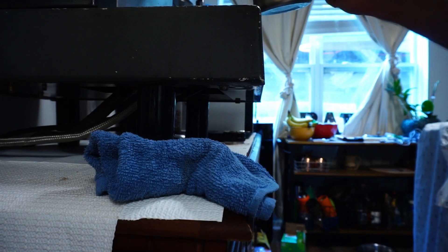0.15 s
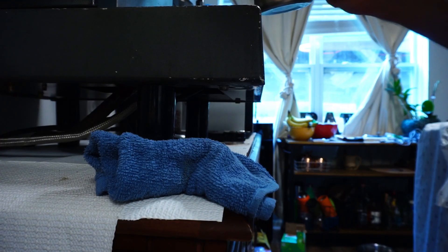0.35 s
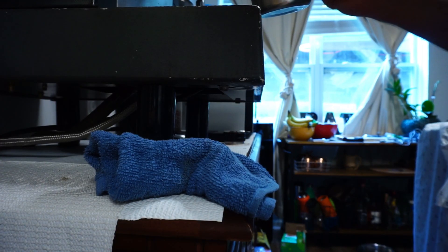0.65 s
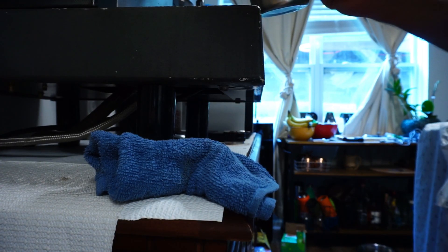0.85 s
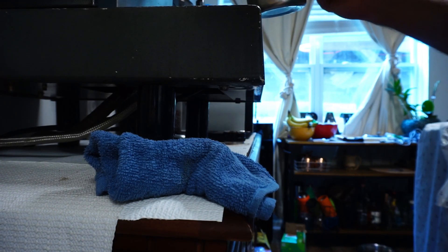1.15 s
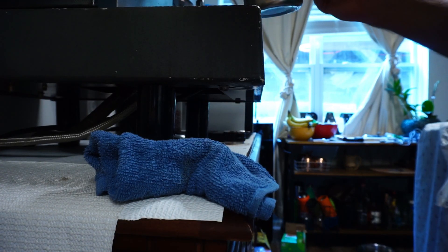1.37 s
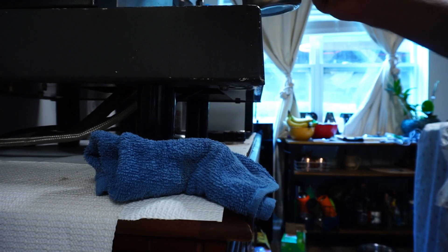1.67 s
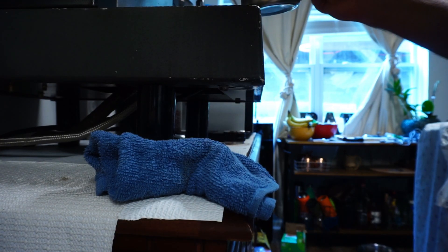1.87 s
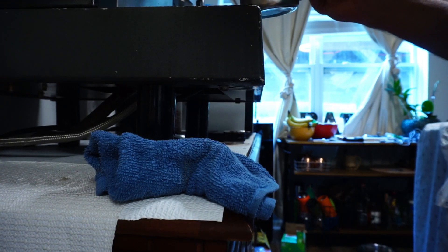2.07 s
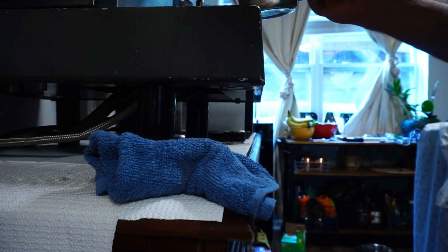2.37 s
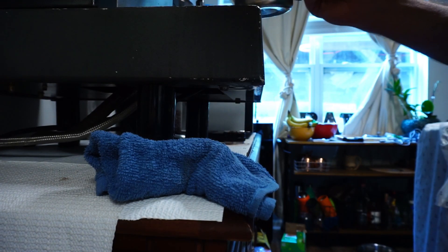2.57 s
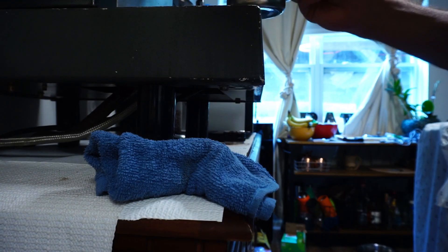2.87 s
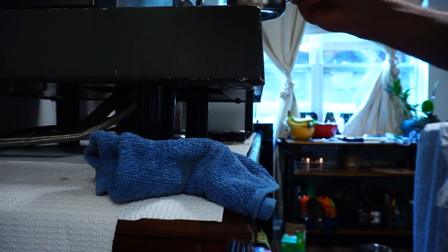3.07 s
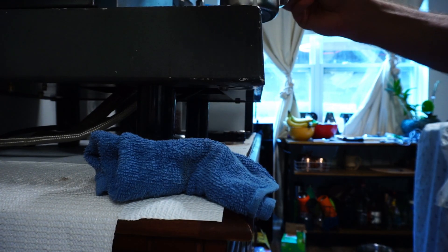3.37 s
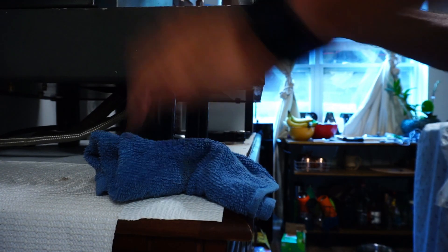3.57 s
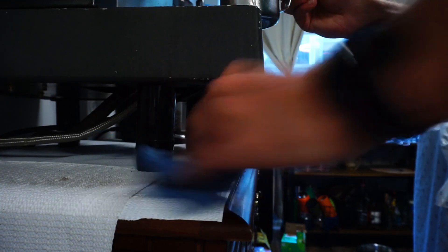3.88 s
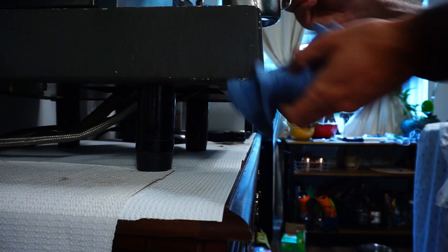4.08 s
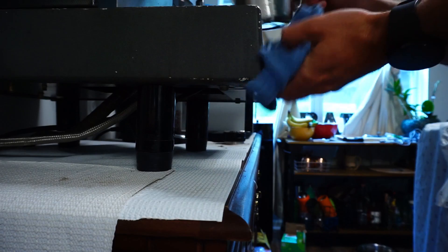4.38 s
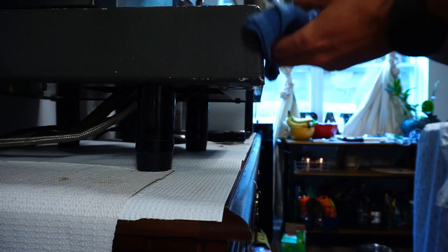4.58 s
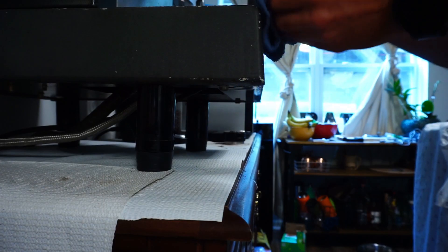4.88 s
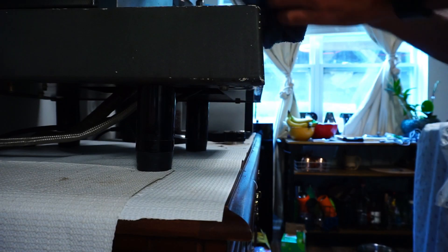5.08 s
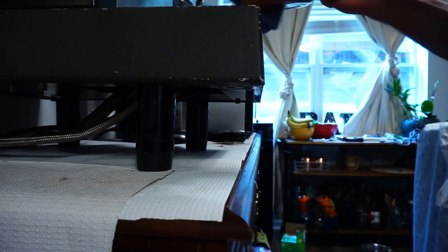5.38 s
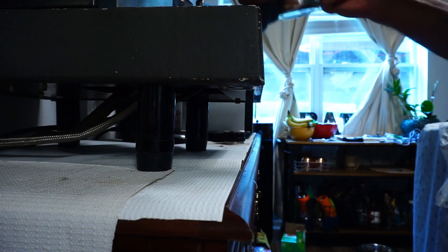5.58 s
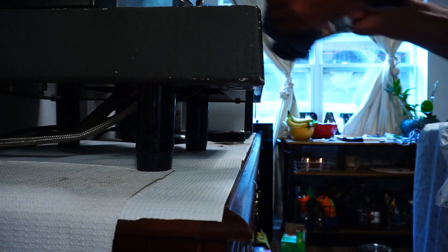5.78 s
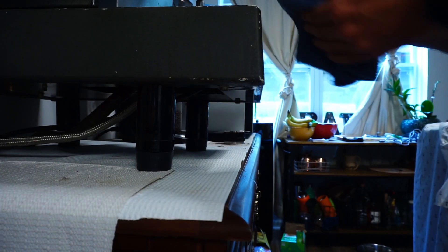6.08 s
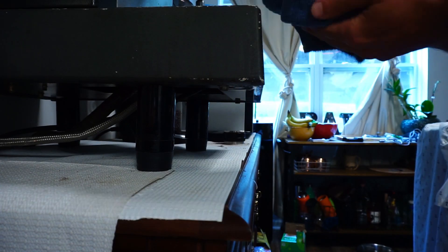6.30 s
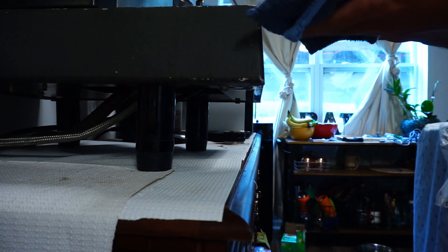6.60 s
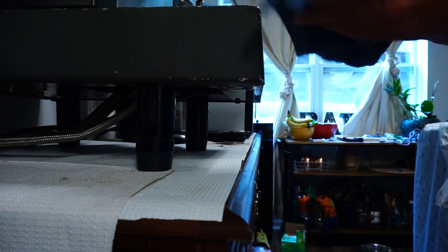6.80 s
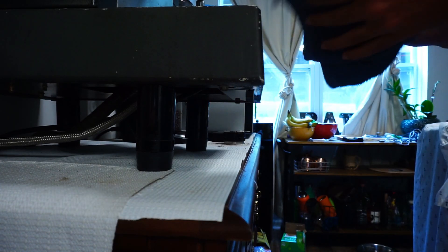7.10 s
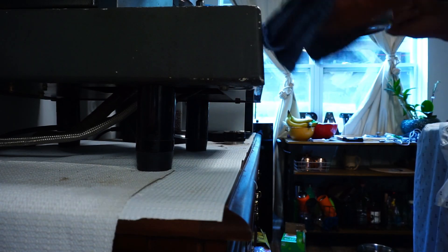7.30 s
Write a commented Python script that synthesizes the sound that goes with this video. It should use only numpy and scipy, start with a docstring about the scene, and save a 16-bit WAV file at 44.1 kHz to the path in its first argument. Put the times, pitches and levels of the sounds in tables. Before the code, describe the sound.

A steam wand hisses loudly in a steel pitcher of milk from the start, spitting in sharp, tearing bursts over crackling, churning bubbles. At about 1.4 seconds the spitting stops and the jet becomes quieter and steadier. A few softer spits return after 2.2 seconds, and a high, breathy whistle joins at around 2.5. Just after 3.1 seconds the valve shuts with a short squeal, and the milk gurgles low until about 3.7. Light, ringing metal knocks follow as the wand is moved, near 4 seconds, loudest at 4.4, and again at 4.8. A cloth rubs faintly along the wand, with small squeaks and another knock between 5.5 and 5.8 seconds. The rubbing fades, and faint taps come near 6.8 and 7.2. Everything is close, with the short echo of a small kitchen over soft, steady air noise and a faint appliance hum.

```python
"""Torn, spitting hiss comes first: a steam wand's tip gulps air at the surface of milk in a steel pitcher.
Below it the jet is noise through nozzle resonances, and collapsing bubbles are a crackle that rings the
pitcher. The valve shuts with short whistles, and gliding low tones gurgle as the milk settles.
Then the wand is swung and wiped: ringing knocks, rubbed-cloth noise and unsteady squeaks.
Echoes of a small kitchen surround it all, over steady air noise and a faint hum."""
import sys
import numpy as np
from scipy import signal
from scipy.fft import rfft, irfft
from scipy.io import wavfile
from scipy.ndimage import uniform_filter1d

SR = 44100
rng = np.random.default_rng(int(sys.argv[2]) if len(sys.argv) > 2 else 0)


def dump_mix(stems):
    """Bounce the given channels to the path in sys.argv[1] as a 16-bit WAV at rate SR."""
    frames = np.atleast_2d(stems).T  # one column per channel
    limited = np.clip(frames, -1, 1)  # hard clip at full scale
    pcm = np.round(limited * 32767).astype(np.int16)
    wavfile.write(sys.argv[1], SR, pcm)


N = 328545
TIME, HZ = np.arange(N) / SR, np.fft.rfftfreq(N, 1 / SR)

# Levels of sources are before the kitchen's echoes.
# The tip breaks the surface and sucks air:
# t/s, length/s, level/dB before the opening burst, brightness/(dB per octave), pitch of the air cavity f/Hz
GULPS = [(0, 0.017, -5, 4.5, 12600), (0.022, 0.12, -15, -3.5, 10700), (.135, 0.041, -12, -4, 13300),
         (0.255, .007, -18, 5, 14000), (0.334, 0.0087, -29, -11, 12370), (0.409, 0.012, -16.5, -6, 10000),
         (0.446, 0.0099, -15.5, -7, 10900), (0.474, 0.0086, -13, 3, 13400), (0.554, 0.025, -7, -2.5, 13200),
         (0.58, 0.097, -9.5, -1.5, 12400), (0.756, 0.012, -18, -3, 9400), (0.779, 0.017, -9, 1.5, 12700),
         (0.81, .008, -14, -13, 9300), (0.822, .01, -11, -2, 14300), (0.845, .016, -7.5, -2.5, 9250),
         (0.887, .018, -15, -5, 9400), (0.915, .075, -6.5, -1.5, 9400), (1.084, 0.017, -6.5, 0.5, 9400),
         (1.107, 0.019, -5, 2, 12300), (1.192, 0.04, -17.5, -9, 12500), (1.291, .010, -12.5, -6, 15000),
         (1.316, 0.03, -12.5, -8.5, 13000), (2.226, 0.018, -22, -16, 4700),
         (2.259, 0.0069, -23.5, -15, 9000), (2.282, .0055, -24, -13, 10500),
         (2.293, 0.0039, -13.5, -4, 14000), (2.392, .0089, -26.5, -6, 5000),
         (2.938, 0.036, -24.5, -17, 6300), (2.983, .008, -30, -21, 6200), (3.107, 0.04, -28, -17.5, 9800)]
# Spectrum of torn air: f/Hz, level/dB
TEARING_COLOUR = [(30, -94), (150, -63.5), (400, -60.5), (1400, -30), (2600, -22.5), (3500, -23.5),
                  (4500, -15), (5600, -12), (7000, -6.5), (9500, -1.5), (12500, 0), (16000, 0)]
SPRAY_SHARE, SPRAY_S = 0.12, 0.033  # share of each gulp that trails on as spray, and its fading time
CAVITY_WIDTH_HZ, CAVITY_DB = 1900, 5

# Steam through the nozzle: t/s, level/dB
JET_LEVEL = [(0, -14), (.3, -35), (.55, -19), (1.27, -27), (1.37, -24), (1.48, -41.5), (2.3, -36.5),
             (3.14, -34)]
# Spectrum of the jet: f/Hz, level/dB
JET_COLOUR = [(40, -60), (200, -36), (500, -9), (2000, -42.5), (4500, -1.5), (6000, -3.5), (8000, -4.5),
              (12000, -0.5), (14000, -1), (16000, 0)]
# Resonances (or dips) of the nozzle: f/Hz, width/Hz, level/dB
NOZZLE = [(6630, 300, 3.5), (7700, 340, 8.5), (7900, 350, -4.5), (8520, 240, 12), (9390, 200, 4),
          (9970, 260, 3), (11280, 190, 8), (11900, 299, 4.5), (13070, 250, 6.5), (14100, 600, -3),
          (15000, 360, 7.5), (15700, 300, 4)]
# A breathy whistle at the tip as the valve narrows: t/s, f/Hz, level/dB
SINGING = [(2.45, 4900, -62), (2.58, 4880, -45), (2.7, 4860, -39.5), (2.78, 4840, -40), (2.92, 4820, -36.5),
           (2.99, 4790, -36), (3.06, 4780, -56)]
SINGING_WIDTH_HZ = 260  # width of its breathy part
SINGING_CLEAN, SINGING_WAVER = .35, .012  # share of pure tone, and rms wobble of its pitch as a share
SHUT_S, JET_DIES_S = 3.145, 0.012  # the valve closes, and how fast the jet fades
AFTER_DB, AFTER_S = -15.5, 0.14  # steam left in the wand leaks away: level and fading time

# Collapsing bubbles, before the small lifts in boil():
# t/s, churn of the milk level/dB, sizzle of the finest bubbles level/dB
BOIL_LEVEL = [(0.0, -31, -28), (0.12, -28, -26), (.545, -33.5, -26.5), (.585, -38.5, -31),
              (.62, -34, -31.5), (.69, -31, -24), (0.98, -30.5, -26), (1.01, -33.5, -31.5),
              (1.18, -24.5, -24.5), (1.42, -33, -26), (1.46, -35, -36), (1.578, -32, -35),
              (1.832, -45.5, -48), (2.13, -45, -46), (2.25, -40, -35), (2.45, -40, -41.5),
              (2.76, -40.5, -46.5), (2.785, -37.5, -38), (2.93, -36, -40), (2.96, -31.5, -36),
              (3.1, -32.5, -36.5), (3.16, -32.5, -36.5), (3.21, -32.5, -51), (3.3, -54, -39)]
# Spectrum of the churn: f/Hz, level/dB
CHURN_COLOUR = [(25, -55), (70, -31.5), (140, -6.5), (300, -3.5), (600, -1.5), (900, 0.5), (1350, 4.5),
                (2200, -2), (3000, -2.5), (5000, -27), (10000, -51.5)]
# Spectrum of the sizzle: f/Hz, level/dB
SIZZLE_COLOUR = [(1000, -38), (2500, -19), (3300, 4), (4100, 4.5), (5000, 0.5), (6000, -5), (9000, -8),
                 (16000, -38)]
# Resonances (or dips) of the steel pitcher: f/Hz, width/Hz, level/dB
PITCHER = [(455, 17, 9), (594, 45, 7.5), (868, 78, 5), (1235, 78, 5), (1398, 57, 8), (1568, 50, 9),
           (1700, 83, 5), (1985, 39, 10.5), (2137, 54, 13), (2666, 440, 6.5), (3040, 130, -4),
           (3214, 150, 3.5), (4200, 170, 0.5)]
# Surges as larger pockets of steam cave in, and brief dips: t/s, length/s, change of the sizzle level/dB
SURGES = [(0.729, 0.018, 3), (1.171, 0.011, 3.5), (1.2, 0.026, 5.5), (1.252, 0.0048, -1), (1.507, 0.011, 4),
          (1.543, 0.0076, -9), (2.389, 0.013, 7.5), (2.429, 0.0058, 6.5), (2.48, .006, 7),
          (2.496, 0.012, 11), (3.042, .006, 3)]
SURGE_CHURN, SURGE_DIES_S = 0.41, 0.0016  # share of a surge that the churn follows, and its fall
# The cloud of fine bubbles rings lower overall as the foam grows: t/s, f/Hz
CLOUD_PITCH = [(.3, 4270), (1.2, 4100), (1.6, 3860), (2.25, 4100), (2.6, 3440), (2.95, 3280), (3.2, 2980)]
CLOUD_WIDTH_HZ, CLOUD_DB = 660, -8  # its level is relative to the fine crackle
BOIL_LINGERS_S, BOIL_DIES_S = 0.078, 0.013  # the last steam still collapses in the milk

# The plainest gurgles and puffs in the milk: t/s, starting pitch f/Hz, level/dB, time to fall 60 dB t60/s
GURGLES = [(0.026, 253, -29, 0.4), (0.069, 299.4, -29, 0.22), (0.132, 262.5, -30.5, 0.3),
           (0.171, 315, -31, 0.23), (1.278, 147.4, -34.5, 0.32), (1.5, 148, -36, 0.31),
           (2.089, 334, -33.5, 0.12), (2.1, 422, -30.5, .08), (2.494, 150, -32, 0.19),
           (2.959, 146, -33, 0.17), (3.065, 601, -25, 0.087), (3.074, 145, -31, 0.19),
           (3.2, 407, -26, 0.11), (3.203, 638, -21, 0.081), (3.219, 279, -28, 0.075),
           (3.26, 239, -37, 0.29), (3.305, 154, -31, 0.23), (3.362, 138, -24.5, 0.14),
           (3.48, 227, -34, 0.12), (3.49, 153, -35, 0.16), (3.569, 140, -41, .25)]
# Lesser bubbles: middle pitch, spread up and down, level relative to the churn table, t60 in s
BUBBLE_HZ, BUBBLE_OCTAVES, BUBBLE_DB, BUBBLE_T60 = 259, 0.7, -5.5, 0.1

# Whistles and rough hoots of the closing valve:
# t/s, length/s, f/Hz, level/dB, fall per overtone/dB, rms wobble of pitch as a share
WHISTLES = [(3.143, 0.0085, 3270, -22.5, -9, 0.024), (3.149, 0.0081, 2590, -24.5, -12, 0.16),
            (3.16, 0.041, 1645, -33.5, -30, 0.097)]

# Knocks and the swells of their lingering ring:
# t/s, level/dB, centre of what it excites f/Hz, spread/octaves, metal tick level/dB
KNOCKS = [(3.924, -32, 516, 1.8, -52), (3.946, -36, 330, 1.2, -61), (4.0374, -37, 600, 3.2, -31),
          (4.052, -38.5, 330, 1.4, -35), (4.4137, -21.5, 676, 0.68, -35), (4.418, -37.5, 145, 0.48, -60),
          (4.421, -35.5, 1570, 0.67, -40), (4.425, -27, 396, 0.47, -44), (4.443, -35, 474, 1.1, -53),
          (4.465, -37, 700, 0.88, -56), (4.495, -39.5, 2800, 0.35, -37.5), (4.7642, -38, 1500, 2.5, -31),
          (4.767, -39, 710, 0.28, -46), (4.778, -40.5, 226, 0.23, -50), (4.828, -43, 248, 0.18, -69),
          (5.26, -47.5, 984, 1.06, -49.5), (5.533, -43.5, 940, 0.7, -66), (5.705, -39, 265, 0.41, -53),
          (5.7716, -29, 680, 0.21, -28.5), (5.775, -35.5, 290, 0.34, -60), (5.785, -44, 690, 0.29, -46),
          (5.83, -40, 263, 0.48, -70), (6.813, -48, 3700, 0.6, -58), (7.2, -41.5, 424, 1, -74),
          (7.226, -49, 400, 1.1, -72)]
# What the machine rings with, before the grip's detuning: f/Hz, level/dB, t60/s
MACHINE_MODES = [(145.4, 1, 0.18), (216, -3, 0.5), (241.1, -0.5, 0.66), (286, 6.5, 0.19), (343, -1.5, 0.12),
                 (386, 0.5, .1), (412.6, 5.5, 0.18), (467, -3.5, 0.076), (535, 1.5, 0.11), (650, 3, 0.064),
                 (719, 5.5, 0.075), (1144, 2, 0.086), (1400, -0.5, 0.08), (1497, -8, 0.2),
                 (1949, -2, 0.083), (2130, -3, 0.1), (2410, -5, 0.07), (3350, 9, 0.022), (3770, -2, .08),
                 (4270, -1, 0.16)]
# Spectrum of the metal tick: f/Hz, level/dB
TICK_COLOUR = [(500, 0), (2000, -1), (3500, -3), (6000, 0), (12000, -1.5), (16000, -6.5)]
GRIP_DETUNE = .011  # the hand's grip shifts each mode from row to row: rms, as a share
RING_UP_CYCLES = 0.2  # swelling time in cycles, so low modes take longer

# Strokes of the cloth on steel: t/s, swell/s, fade/s, level/dB
STROKES = [(3.77, 0.16, 0.1, -51.5), (4.41, 0.024, 0.52, -51.5), (4.62, 0.22, 0.13, -65.5),
           (5.23, 0.085, .08, -58.5), (5.5, 0.068, 0.77, -58.5), (5.689, 0.01, 0.077, -40)]
# Spectrum of the rubbed cloth: f/Hz, level/dB
WEAVE_COLOUR = [(150, -8), (700, 9.5), (1600, 5), (3000, -0.5), (4500, 2), (7000, -1.5), (10000, 4.5),
                (16000, -3)]
# The wand scrapes and squeaks as it turns:
# t/s, length/s, f/Hz, level/dB, fall per overtone/dB, rms wobble of pitch as a share
SQUEAKS = [(5.55, 0.062, 1447, -54, -15, 0.41), (5.692, 0.0043, 1560, -31, -29, 0.034),
           (5.703, 0.013, 1538, -32.5, -30, 0.046), (5.692, 0.033, 2250, -45, -25, 0.048),
           (5.722, 0.057, 1384, -46, -27, 0.116), (5.724, 0.034, 743, -43, -17, 0.095)]

# Spectrum of the steady air noise: f/Hz, level/dB
AIR_COLOUR = [(15, -38.5), (25, -8), (64, -4), (160, -3), (188, -6.5), (227, -6), (378, -7.5), (469, -13),
              (582, -15), (741, -13), (871, -15.5), (1110, -17), (1200, -18), (3630, -24.5), (15500, -24)]
AIR_DB = -54
# Width of the steady noise, narrow in bass and top treble, wide between: f/Hz, side over mid as a ratio
AIR_WIDTH = [(80, 0.18), (220, 0.578), (500, 1.3), (1100, 1.5), (4000, 1.3), (7000, .8), (9500, 0.054)]
# Hum of appliances: f/Hz, rms level/dB
HUM = [(59.5, -66), (221, -71), (474, -68.5)]

# How fast the kitchen's tail dies: f/Hz, t60/s
KITCHEN_T60 = [(150, 1), (500, 0.94), (1500, 0.58), (4000, 0.27), (9000, 0.4), (16000, 0.19)]
# Share of each echo that differs between the microphones, for handling and gurgles: f/Hz, share
APART = [(100, 0.22), (400, 0.5), (1200, 0.65), (4000, 0.8), (6500, 0.9), (10000, 0)]
# The same for the loud gulps: f/Hz, share
GULP_APART = [(400, .35), (4000, .6), (8000, .42), (14000, .36)]
# The same for the steam: f/Hz, share
STEAM_APART = [(100, .3), (400, .3), (1200, .62), (2200, .55), (4000, .8), (6500, .9), (10000, .3)]
# How far sound favours the left microphone: f/Hz, multiple of each source's own lean
LEAN = [(380, 0.052), (700, 2.1), (1300, 0.48), (2400, 0.84), (8000, 2.6), (15000, 1.1)]
# The steam drifts to the left as the pitcher is moved: t/s, left minus right level/dB
SHIFT = [(1.2, 0), (2.0, 2), (2.7, 1.3), (3.15, 1.5)]

# Gain control: threshold, gain cut in dB per dB over it, and how fast the held peak level sinks
LIMIT_DB, SQUEEZE, RECOVER_DB_PER_S = -19, 0.3, 26
EDGE_HZ = 15950  # top of the band


def gulps(patchy_db=3.5, burst_s=0.0066, flutter_db=0.7):
    """Each gulp bursts open and sprays on, coloured by its own air cavity and by quickly shifting patches."""
    _, _, grid = signal.stft(crackle(per_s=550, spread_db=3.3, wash=1), SR, nperseg=512)
    # smooth chance over pitch and time makes the patches
    patches = uniform_filter1d(rng.standard_normal(grid.shape), size=5, axis=0)
    patches = unit(uniform_filter1d(patches, size=4, axis=1))
    patchy = signal.istft(grid * amp(patchy_db * patches), SR, nperseg=512)[1][:N]
    spray = colour(patchy, TEARING_COLOUR) * amp(flutter_db * wander(N, 110))

    out, t = np.zeros(N), np.arange(SR // 4) / SR
    hz = np.fft.rfftfreq(len(t), 1 / SR)
    octaves = np.log2(np.maximum(hz, 3500) / 9000)
    rise, fall, burst = .0005, .0036, .38  # s, s, extra gain at the start
    for s, length, db, tilt, cavity_hz in GULPS:
        cavity = CAVITY_DB / (1 + (2 * (hz - cavity_hz) / CAVITY_WIDTH_HZ) ** 2)
        piece = spray[max(0, round(s * SR)):][:len(t)]
        tear = irfft(rfft(piece) * amp(tilt * octaves + cavity), len(t))
        body = (1 - SPRAY_SHARE) * gate(t, length, rise, fall)
        trail = SPRAY_SHARE * gate(t, length, rise, SPRAY_S)
        opening = 1 + burst * np.exp(-t / burst_s)
        add(out, s, amp(db) * unit(tear) * (body + trail) * opening)
    return out


def jet(flutter_db=0.4):
    """The submerged jet hisses through the resonances of the nozzle, and sings as the valve narrows."""
    hiss = colour(rng.standard_normal(N), JET_COLOUR, NOZZLE)
    when, hz, _ = np.transpose(SINGING)
    pitch = np.interp(TIME, when, hz) * (1 + SINGING_WAVER * wander(N, 250))
    tone = unit(np.sin(2 * np.pi * np.cumsum(pitch) / SR))
    breath = ringing(SINGING, SINGING_WIDTH_HZ)
    song = (breath * (1 - SINGING_CLEAN) + tone * SINGING_CLEAN) * level(SINGING, column=2)
    flutter = amp(flutter_db * wander(N, 50.1))
    return (level(JET_LEVEL) * hiss + song) * flutter * shut(SHUT_S, JET_DIES_S)


def boil(churn_db=1.0, sizzle_db=1.0, throb_db=1.2, clump_db=1.4):
    """Steam bubbles collapse in clumps and surges, and ring the pitcher and the cloud of foam."""
    surge_db = sum(db * (TIME > s) * flow(s + length, SURGE_DIES_S) for s, length, db in SURGES)
    coarse = colour(crackle(per_s=600, spread_db=2.5, wash=1.0), CHURN_COLOUR, PITCHER)
    churn = coarse * level(BOIL_LEVEL) * amp(churn_db + SURGE_CHURN * surge_db)
    fine = colour(crackle(per_s=900, spread_db=2.8, wash=.6), SIZZLE_COLOUR, PITCHER)
    cloud = amp(CLOUD_DB) * ringing(CLOUD_PITCH, CLOUD_WIDTH_HZ)
    clumps = amp(sizzle_db + surge_db + clump_db * wander(N, 70))
    sizzle = (fine + cloud) * level(BOIL_LEVEL, column=2) * clumps
    throb = amp(throb_db * wander(N, 190))
    return (churn + sizzle) * throb * shut(SHUT_S + BOIL_LINGERS_S, BOIL_DIES_S)


def whistles():
    """Steam squeals and hoots through the closing valve, as short unsteady tones."""
    return squeals(WHISTLES, swell=0.029, fall=0.016)


def gurgles(glide=-0.72, waver=0.054, count=10):
    """Gurgles and bubbles swell, wobble and ring, gliding down by a share of their pitch per second."""
    out, t = np.zeros(N), np.arange(SR // 3) / SR
    swell = 1 - np.exp(-t / .014)
    when, churn_db, _ = np.transpose(BOIL_LEVEL)
    # while the valve is open, one lesser bubble falls at random in each of equal slots of time
    late, size = rng.random((count, 2)).T
    starts = SHUT_S * (np.arange(count) + late) / count
    pitches = BUBBLE_HZ * 2 ** (BUBBLE_OCTAVES * (2 * size - 1))
    lesser = [(s, hz, np.interp(s, when, churn_db) + BUBBLE_DB, BUBBLE_T60)
              for s, hz in zip(starts, pitches)]
    for s, hz, db, t60 in GURGLES + lesser:
        turns = np.cumsum(hz * (1 + glide * t + waver * wander(len(t), 39.6))) / SR
        add(out, s, amp(db - 60 * t / t60) * swell * np.sin(2 * np.pi * turns))
    return out


def snap(s=3.573, hz=6400, db=-30.0, fall=0.00068):
    """One tiny dry snap of coloured noise, as of a foam bubble bursting."""
    out, t = np.zeros(N), np.arange(SR // 50) / SR
    spectrum = [(2500, -37), (4500, -6), (8000, 18.0), (16000, -33)]  # f/Hz, level/dB
    fizz = colour(rng.standard_normal(N), spectrum, [(hz, 1800, 8)])
    add(out, s, amp(db) * fizz[:len(t)] * np.exp(-t / fall))
    return out


def knocks(tick_s=0.0029, clatter=0.57, clatter_s=0.0083, rise=0.00063):
    """Each knock or swell rings the machine's modes near its centre, with a short clatter and a metal tick."""
    out, ticks, t = np.zeros(N), np.zeros(N), np.arange(SR) / SR
    mode_hz, mode_db, t60 = np.transpose(MACHINE_MODES)[:, :, None]
    bins = np.fft.rfftfreq(len(t), 1 / SR) + 1  # the 1 avoids zero
    attack = 1 - np.exp(-t / rise)
    decay = amp(-60 * t / t60) * (1 - np.exp(-t * mode_hz / RING_UP_CYCLES))
    for s, db, centre, spread, tick_db in KNOCKS:
        def drive(f):
            """How strongly each frequency is excited."""
            return 1 / (1 + (np.log2(f / centre) / spread) ** 4)

        weight = amp(mode_db) * drive(mode_hz)
        weight = weight / np.linalg.norm(weight)
        detuned = mode_hz * (1 + GRIP_DETUNE * rng.standard_normal(mode_hz.shape))
        phase = 2 * np.pi * (detuned * t + rng.random(mode_hz.shape))
        ring = (weight * decay * np.sin(phase)).sum(0)
        noise = rfft(rng.standard_normal(len(t)))
        loose = unit(irfft(noise * drive(bins) / np.sqrt(bins), len(t)))
        add(out, s, amp(db) * (ring + clatter * loose * np.exp(-t / clatter_s) * attack))
        add(ticks, s, amp(tick_db) * np.exp(-t / tick_s))
    return out + ticks * colour(rng.standard_normal(N), TICK_COLOUR)


def cloth():
    """Damp fibres catch and slip along the wand; each stroke swells and fades."""
    rub = np.zeros(N)
    for s, swell, fade, db in STROKES:
        rub += amp(db) * np.clip((TIME - s) / swell, 0, 1) * flow(s + swell, fade)
    return rub * colour(crackle(per_s=980, spread_db=2, wash=0.61), WEAVE_COLOUR)


def squeaks():
    """The turning wand rubs out short, unsteady scrapes and squeaks."""
    return squeals(SQUEAKS, swell=0.021, fall=0.0035)


def room_tone():
    """Steady air noise, narrow in bass and top treble and wide between, and the hum of appliances."""
    mid, side = (colour(rng.standard_normal(N), AIR_COLOUR) for _ in range(2))
    side = irfft(rfft(side) * read(AIR_WIDTH, HZ), N)
    hum = np.zeros(N)
    for hz, db in HUM:
        hum += amp(db) * np.sqrt(2) * np.sin(2 * np.pi * hz * TIME + wander(N, 6.0))
    return amp(AIR_DB) * np.array([mid + side, mid - side]) + hum


def kitchen(x, near_db, wet_db, left_db, near_s, apart, lag_s):
    """Direct sound, quick echoes off machine and counter, and the room's tail, at two close microphones."""
    t = np.arange(SR // 2) / SR
    sparse = rng.random((2, len(t))) < 4000 / SR  # 4000 reflections a second
    taps = rng.standard_normal((2, len(t))) * sparse * (t > .001)
    hz, when, (shared, own) = signal.stft(taps, SR, nperseg=256)
    # share of each echo that differs between microphones, by frequency
    differ = np.clip(read(apart, hz), 0, .9)[:, None]
    alike = np.sqrt(1 - differ ** 2) * shared
    pair = np.array([alike + differ * own, alike - differ * own])

    echo = np.zeros((2, len(t)))
    near = np.exp(-when / near_s)
    tail = amp(-60 * when / read(KITCHEN_T60, hz)[:, None]) * (when > .012)
    for db, fade in ((near_db, near), (wet_db, tail)):
        part = signal.istft(pair * fade, SR, nperseg=256)[1][:, :len(t)]
        echo += amp(db) * part / np.linalg.norm(part[0])
    echo[:, 0] += 1  # direct sound

    # echoes comb the sound finely but leave its broad colour as it is
    response = np.fft.fft(echo)
    broad = uniform_filter1d(abs(response.mean(0)) ** 2, size=90, mode="wrap")
    broad_filter = np.exp(signal.hilbert(np.log(broad) / 2).conj())  # minimum phase
    # lean and lag between the microphones, half to each side; a positive lag makes the left later
    hz, side = np.fft.fftfreq(len(t), 1 / SR), np.array([[.5], [-.5]])
    lean = amp(side * left_db * read(LEAN, abs(hz)))
    lag = np.exp(-2j * np.pi * side * lag_s * hz)
    echo = np.fft.ifft(lean * lag * response / broad_filter).real
    lead = 256  # samples of room for what wraps round ahead of the direct sound
    return signal.fftconvolve(x[None], np.roll(echo, lead, axis=1), axes=1)[:, lead:lead + N]


def squeals(rows, swell, fall, rough_db=2):
    """Unsteady self-sustained tones with two overtones; each swells for a share of its length."""
    out, t = np.zeros(N), np.arange(SR // 2) / SR
    for s, length, hz, db, overtone_db, waver in rows:
        phase = 2 * np.pi * np.cumsum(hz * (1 + waver * wander(len(t), 907))) / SR
        tone = sum(amp(k * overtone_db) * np.sin((k + 1) * phase) for k in range(3))
        rough = amp(db + rough_db * wander(len(t), 407))
        add(out, s, rough * unit(tone) * gate(t, length, swell * length, fall))
    return out


def crackle(per_s, spread_db, wash):
    """Noise in pops of uneven size, about a millisecond long, over a wash of countless small ones."""
    sizes = amp(spread_db * np.minimum(rng.exponential(1, N), 3.5))
    pops = (rng.random(N) < per_s / SR) * sizes
    power = signal.lfilter([1], [1, -np.exp(-1 / (0.00045 * SR))], pops ** 2)
    return rng.standard_normal(N) * np.sqrt(power / power.mean() + wash)


def ringing(rows, width_hz):
    """Noise in one resonance that follows a curve of pitch; rms 1."""
    rows = np.array(rows)
    turn = np.exp(2j * np.pi * np.cumsum(np.interp(TIME, rows[:, 0], rows[:, 1])) / SR)
    r = np.exp(-np.pi * width_hz / SR)
    narrow = signal.lfilter([1], [1, -2 * r, r * r], rng.standard_normal(N) / turn)
    return unit((turn * narrow).real)


def shut(until, fall):
    """The steam stops quickly, and a little leaks on."""
    return (1 - amp(AFTER_DB)) * flow(until, fall) + amp(AFTER_DB) * flow(until, AFTER_S)


def flow(until, fall):
    """Full until a given time, then dying away."""
    return np.exp(-np.maximum(TIME - until, 0) / fall)


def gate(t, length, rise, fall):
    """Opens, holds for length, dies away."""
    return (1 - np.exp(-t / rise)) * np.exp(-np.maximum(t - length, 0) / fall)


def colour(x, points, peaks=()):
    """Filters by a smooth spectrum with resonances on top; rms 1."""
    db = read(points, HZ) + sum(g / (1 + (2 * (HZ - f) / w) ** 2) for f, w, g in peaks)
    return unit(irfft(rfft(x) * amp(db), N))


def wander(n, hz):
    """Smooth chance of rms 1 that moves at about hz."""
    knots = rng.standard_normal(n // 20)
    return unit(np.interp(np.arange(n) * hz / SR, np.arange(len(knots)), knots))


def level(rows, column=1):
    """Gain over time from a dB column."""
    rows = np.array(rows)
    return amp(np.interp(TIME, rows[:, 0], rows[:, column]))


def read(points, hz):
    """Reads a table of frequencies on a log-frequency axis."""
    f, value = np.transpose(points)
    return np.interp(np.log(hz + 1), np.log(f), value)


def add(mix, s, sound):
    """Adds a sound at time s."""
    part = mix[max(0, round(s * SR)):][:len(sound)]
    part += sound[:len(part)]


def amp(db):
    """Decibels to gain."""
    return np.exp(np.asarray(db) * (np.log(10) / 20))


def unit(x):
    """Scales to rms 1."""
    return x / np.sqrt(np.mean(x ** 2) + 1e-20)


def scene():
    """Steaming, then the wiping of the wand, each source placed in the kitchen."""
    torn = kitchen(gulps(), near_db=3.5, wet_db=-5, left_db=0.97, near_s=0.006,
                   apart=GULP_APART, lag_s=8e-6)
    steam = kitchen(jet() + boil() + whistles(), near_db=-3.5, wet_db=-9.5, left_db=1.5, near_s=0.0068,
                    apart=STEAM_APART, lag_s=6e-6)
    steam = level(SHIFT) ** np.array([[.5], [-.5]]) * steam  # half the shift to each side
    milk = kitchen(gurgles() + snap(), near_db=-7, wet_db=-14, left_db=.3, near_s=.006,
                   apart=APART, lag_s=0)
    handling = kitchen(knocks() + cloth() + squeaks(), near_db=-1.5, wet_db=-13.5, left_db=1.0,
                       near_s=0.019, apart=APART, lag_s=8e-6)
    return torn + steam + milk + handling + room_tone()


def record(dry):
    """Gain control ducks the loudest moments and recovers; then full-scale limit and band limit."""
    power = signal.lfilter([1 / 400], [1, 1 / 400 - 1], (dry ** 2).mean(0))
    loud_db = 10 * np.log10(power + 1e-12)
    sink_db = TIME * RECOVER_DB_PER_S
    held_db = np.maximum.accumulate(loud_db + sink_db) - sink_db  # peaks held, slowly sinking
    over_db = np.maximum(held_db - LIMIT_DB, 0)
    ducked = np.clip(dry * amp(-SQUEEZE * over_db), -1, 1)
    lowpass = signal.firwin(511, EDGE_HZ, window=("kaiser", 9), fs=SR)
    return signal.oaconvolve(ducked, lowpass[None], "same")


dry = scene()
out = record(dry)
dump_mix(out)
```